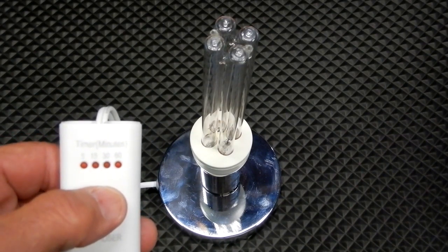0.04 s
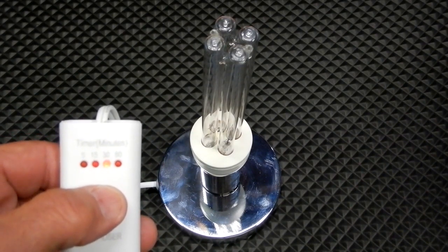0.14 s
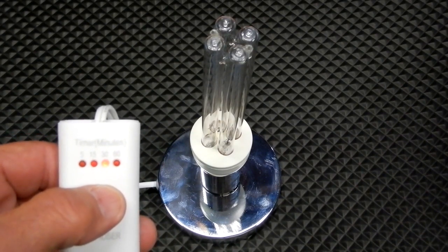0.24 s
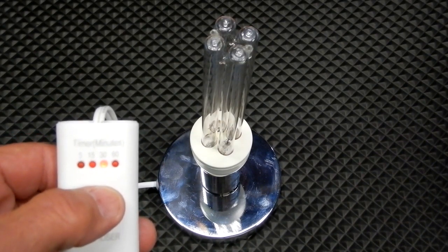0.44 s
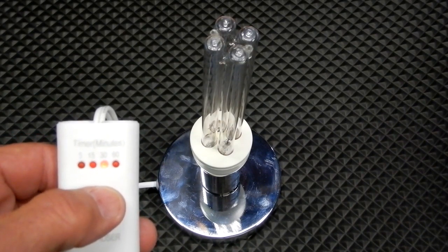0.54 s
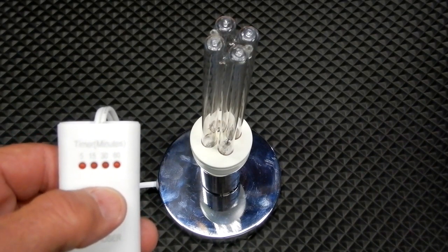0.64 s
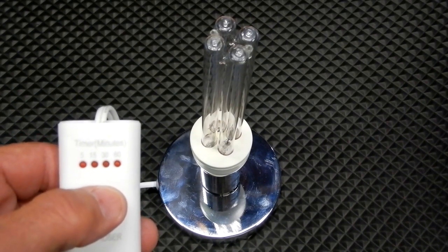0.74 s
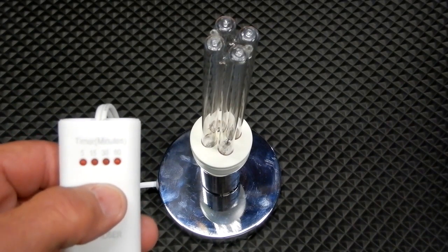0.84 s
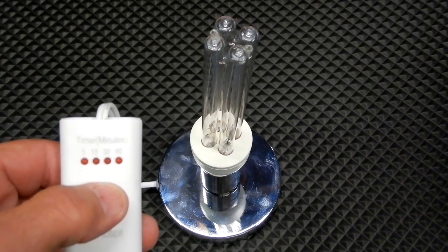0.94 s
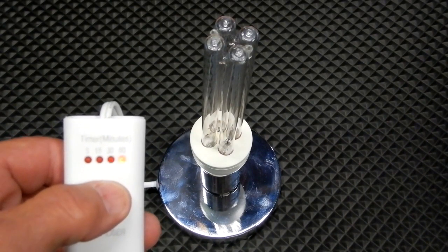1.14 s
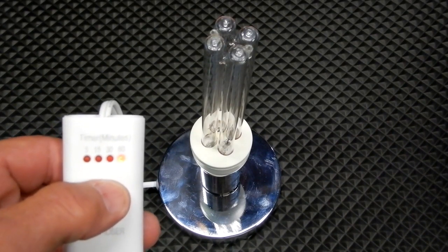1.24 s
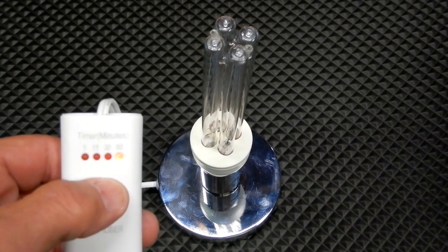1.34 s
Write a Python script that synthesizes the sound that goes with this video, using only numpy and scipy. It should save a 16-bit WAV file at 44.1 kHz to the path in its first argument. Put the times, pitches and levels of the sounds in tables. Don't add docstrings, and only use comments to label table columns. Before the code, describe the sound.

Close-up button clicks on a handheld switch: one crisp snap, a weaker hollow release soon after, faint hand rubbing, then a second crisp snap, in a quiet room with soft steady fan air.

```python
import sys
import numpy as np
from scipy import signal
from scipy.fft import rfft, irfft
from scipy.io import wavfile

SR = 44100
rng = np.random.default_rng(int(sys.argv[2]) if len(sys.argv) > 2 else 0)


def volts_from_db(level):
    exponent = np.asarray(level, float) / 20
    return 10 ** exponent


def master(y):
    cut = np.clip(np.atleast_2d(y).T, -1, 1)
    pcm = np.round(cut * 32767)
    wavfile.write(sys.argv[1], SR, pcm.astype(np.int16))


N = 61739

# [f/Hz, density/dB]
AIR_SPECTRUM = [(30, -17), (110, -12.5), (400, -3), (1400, -5), (3500, -9.5), (6000, -18), (9000, -21),
                (16000, -21)]
AIR_DB = -58.9
AIR_LIKENESS, ALIKE_BELOW_HZ, ALIKE_ABOVE_HZ = .7, 3500, 300

# [f/Hz, width/Hz, level/dB, left over right/dB]
DUCT_RESONANCES = [(182, 30, -70, 1.5), (290, 170, -62.5, -2), (800, 250, -66.5, -6), (1050, 260, -61, -2),
                   (1720, 240, -59, 1.5), (1990, 260, -65.5, 5), (2250, 260, -71, 5), (2850, 450, -72, 9)]
DUCT_LIKENESS, DUCT_FLICKER_DB, DUCT_FLICKER_HZ = .8, 1.12, 8.0

# [t/s, level/dB]
HAND_LEVEL = [
    (0.9, -83),
    (0.958, -65.5),
    (1.03, -60),
    (1.065, -53.5),
    (1.09, -63),
    (1.216, -60),
    (1.284, -65),
    (1.298, -62),
    (1.4, -67),
]
HAND_HZ, HAND_WIDTH_HZ, HAND_FADE_S = (275, 365), 90, .05

SCATTER_DB, SCATTER_T60_S, SCATTER_GAP_S = -24, .03, .002
ROOM_DB, ROOM_T60_S, ROOM_GAP_S, WALL_CUT_HZ = -14.5, .36, .008, 4500
BEAM_HZ, BEAM_WIDTH_HZ, BEAM_KEPT = 5050, 1200, .4
ECHO_TILT = .49

# [t/s, level/dB]
TICKS = [
    (1.3902, -.05),
]
# [f/Hz, left strength, right strength, t60/s]
TICK_MODES = [(1950, -.007, -.007, .012), (3800, .0025, .0025, .05)]

# [t/s, level/dB]
RELEASES = [
    (.42635, -.05),
]
# [f/Hz, left strength, right strength, t60/s]
TOCK_MODES = [(280, -.009, -.009, .03), (646, .026, .028, .019), (1030, -.15, -.15, .0072),
              (1170, -.004, -.006, .035), (1650, -.0127, -.0129, .03), (1978, .018, .017, .055),
              (2890, -.025, -.035, .002), (3160, -.0015, -.0015, .03), (4760, -.024, -.011, .008),
              (6500, .005, .003, .005), (7550, -.004, -.002, .006)]
# [delay/s, left share, right share]
TOCK_ECHOES = [(.00303, -.3, -.31), (.00411, .073, .06), (.00617, .045, .067)]

# [t/s, level/dB]
CRACKLES = [
    (.2094, -40),
    (.4267, -48),
    (1.2150, -40),
]
CRACKLE_T60_S, CRACKLE_BAND_HZ = .013, [5800, 11000]

# [t/s, level/dB]
PRESSES = [
    (.209085, .6),
    (1.21469, .4),
]
# [f/Hz, left strength, right strength, t60/s]
CASE_MODES = [(970, .371, .347, .00458), (1150, .0135, .0161, .023), (1480, -.037, -.041, .02),
              (1750, -.105, -.12, .00935), (2000, .0096, .008, .06), (2460, .958, .689, .0032),
              (3140, -.102, -.094, .0127), (3650, .77, .89, .002)]
# [delay/s, left share, right share]
CASE_ECHOES = [(.00217, -.114, -.143), (.00449, .117, .124), (.00604, -.036, -.046)]
# [f/Hz, left strength, right strength, t60/s]
SNAP_MODES = [(5950, -.04, -.025, .012), (4681, 3.0, 1.47, .00445), (4748, -2.02, -1.22, .0054),
              (5016, -3.0, -1.35, .0039), (6111, -1.07, -.49, .0028), (7660, .64, .17, .0027),
              (9700, .008, .006, .006), (11500, .022, .014, .003), (13200, -.02, -.014, .003)]
# [delay/s, left share, right share]
SNAP_ECHOES = [(.00215, -.1, -.05), (.0037, .02, .08), (.00584, .02, .035), (.0122, .008, .012),
               (.0143, .012, -.012)]
SNAP_RISE_S, TOCK_RISE_S, TICK_RISE_S = .000865, .00025, .0002
LOW_CUT_HZ = 200

# [t/s, length/s, above f/Hz, loss/dB]
TREBLE_DIPS = [
    (.214, .011, 11500, 25),
    (.2195, .005, 8500, 25),
    (.411, .022, 14000, 20),
    (.42, .015, 12000, 25),
    (1.198, .034, 14000, 20),
    (1.207, .0045, 8000, 22),
    (1.2205, .003, 8500, 22),
    (1.218, .013, 11500, 20),
]
DIP_EDGE_S = .001
TOP_CUT_HZ = 16250


def rms_one(x):
    return x / np.sqrt(np.mean(x ** 2) + 1e-20)


def sides(pan_db):
    return volts_from_db(np.array([[.5], [-.5]]) * pan_db)


def stereo_noise(alike):
    mid, side = rng.standard_normal((2, N))
    alike = np.clip(alike, 0, 1)
    common = np.sqrt(1 + alike) * mid
    opposed = np.sqrt(1 - alike) * side * [[1], [-1]]
    return (common + opposed) * np.sqrt(.5)


def resonance(x, hz, width_hz):
    r = np.exp(-np.pi * width_hz / SR)
    section = [1, 0, -1, 1, -2 * r * np.cos(2 * np.pi * hz / SR), r * r]
    return rms_one(signal.sosfilt([section, section], x))


def drift(rate_hz):
    r = np.exp(-2 * np.pi * rate_hz / SR)
    wander = signal.lfilter([1], [1, -2 * r, r * r], rng.standard_normal(N + SR))
    return rms_one(wander[SR:])


def air():
    hz = np.maximum(np.arange(N // 2 + 1) * SR / N, 1)
    shared = 1 / (1 + (hz / ALIKE_BELOW_HZ) ** 4) / (1 + (ALIKE_ABOVE_HZ / hz) ** 2)
    alike = rfft(stereo_noise(AIR_LIKENESS)) * np.sqrt(shared)
    unlike = rfft(stereo_noise(0)) * np.sqrt(1 - shared)
    point_hz, point_db = np.transpose(AIR_SPECTRUM)
    colour = volts_from_db(np.interp(np.log(hz), np.log(point_hz), point_db))
    return volts_from_db(AIR_DB) * rms_one(irfft((alike + unlike) * colour, N))


def ventilation():
    hum = np.zeros((2, N))
    for hz, width_hz, db, pan_db in DUCT_RESONANCES:
        gain = volts_from_db(db + DUCT_FLICKER_DB * drift(DUCT_FLICKER_HZ))
        hum += gain * sides(pan_db) * resonance(stereo_noise(DUCT_LIKENESS), hz, width_hz)
    return hum


def hand():
    s, db = np.transpose(HAND_LEVEL)
    t = np.arange(N) / SR
    gain = volts_from_db(np.interp(t, s, db) - 5) * np.clip((t - s[0]) / HAND_FADE_S, 0, 1)
    return gain * sum(resonance(stereo_noise(.7), hz, HAND_WIDTH_HZ) for hz in HAND_HZ)


def room(x):
    t = np.arange(SR // 2) / SR
    dull = np.exp(-2 * np.pi * WALL_CUT_HZ / SR)
    near_noise, far_noise = rng.standard_normal((2, 2, len(t)))
    near = near_noise * volts_from_db(SCATTER_DB - 60 * t / SCATTER_T60_S) * (t > SCATTER_GAP_S)
    near = near / np.sqrt(SCATTER_T60_S * SR / 14)
    far = rms_one(signal.lfilter([1], [1, -dull], far_noise)) * volts_from_db(ROOM_DB - 60 * t / ROOM_T60_S)
    far = far * np.clip(t / ROOM_GAP_S, 0, 1) / np.sqrt(ROOM_T60_S * SR / 14)
    edges = [BEAM_HZ - BEAM_WIDTH_HZ / 2, BEAM_HZ + BEAM_WIDTH_HZ / 2]
    source = x[1:]
    beam = signal.sosfilt(signal.butter(1, edges, "band", fs=SR, output="sos"), source)
    off_axis = source - (1 - BEAM_KEPT) * beam
    return signal.fftconvolve(off_axis, near + far, axes=1)[:, :N]


def strikes(events, modes, rise_s, echoes):
    out, span = np.zeros((2, N + SR)), np.arange(SR // 10)
    hz, left, right, t60 = np.array(modes).T[:, :, None]
    reflected = right * (hz / 1000) ** ECHO_TILT
    arrivals = [(0, left, right)]
    arrivals += [(lag, reflected * to_left, reflected * to_right) for lag, to_left, to_right in echoes]
    for s, db in events:
        for lag, *strengths in arrivals:
            start = (s + lag) * SR
            first = int(start)
            t = np.maximum(span + first - start, 0) / SR
            rise = (1 - np.exp(-t / rise_s)) ** 2
            rings = np.sin(2 * np.pi * hz * t) * volts_from_db(db - 60 * t / t60) * rise
            out[:, first:first + len(span)] += (np.array(strengths) * rings).sum(axis=1)
    return out[:, :N]


def tick():
    return strikes(TICKS, TICK_MODES, TICK_RISE_S, [])


def tock():
    return strikes(RELEASES, TOCK_MODES, TOCK_RISE_S, TOCK_ECHOES)


def crackle():
    t = np.arange(N) / SR
    shape = sum(volts_from_db(db - 60 * np.maximum(t - s, 0) / CRACKLE_T60_S) * (t > s) for s, db in CRACKLES)
    band = signal.butter(2, CRACKLE_BAND_HZ, "band", fs=SR, output="sos")
    return signal.sosfilt(band, shape * stereo_noise(.8))


def snap():
    dome = strikes(PRESSES, SNAP_MODES, SNAP_RISE_S, SNAP_ECHOES)
    case = strikes(PRESSES, CASE_MODES, SNAP_RISE_S, CASE_ECHOES)
    return dome + case


def button():
    x = snap() + tock() + tick() + crackle()
    return signal.sosfiltfilt(signal.butter(2, LOW_CUT_HZ, "high", fs=SR, output="sos"), x)


def scene():
    switch = button()
    return switch + room(switch) + ventilation() + air() + hand()


def dip_treble(x):
    t = np.arange(N) / SR
    for s, length, hz, loss_db in TREBLE_DIPS:
        shut = np.clip(np.minimum(t - s, s + length - t) / DIP_EDGE_S + .5, 0, 1)
        treble = signal.sosfiltfilt(signal.butter(6, hz, "high", fs=SR, output="sos"), x)
        x = x - (1 - volts_from_db(-loss_db)) * shut * treble
    return x


def top_cut(x):
    return signal.sosfilt(signal.butter(12, 16200, fs=SR, output="sos"), x)


def record(dry):
    low_pass = signal.cheby2(12, 40, TOP_CUT_HZ, fs=SR, output="sos")
    mix = signal.sosfiltfilt(low_pass, dip_treble(dry))
    return top_cut(mix)


dry = scene()
out = record(dry)
master(out)
```